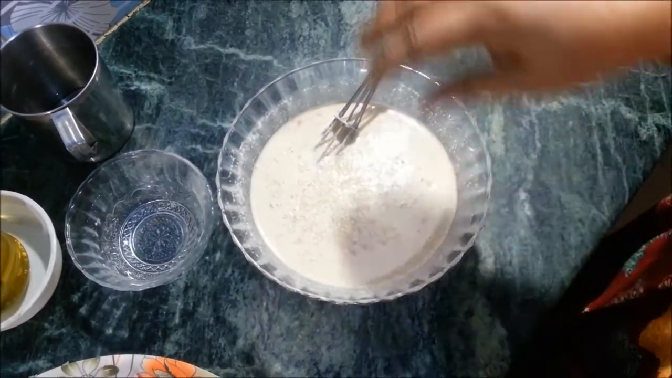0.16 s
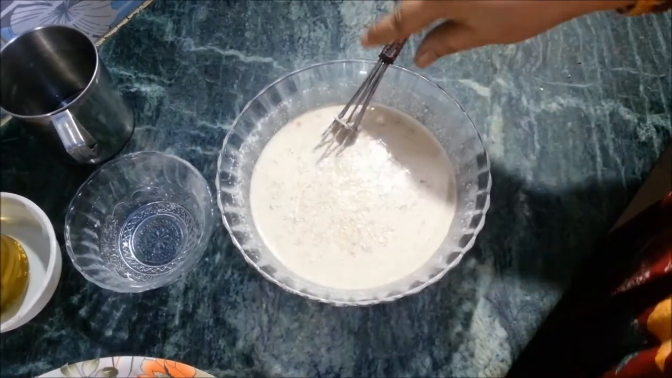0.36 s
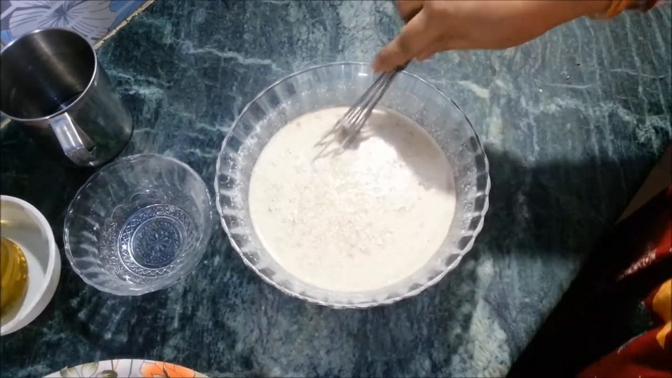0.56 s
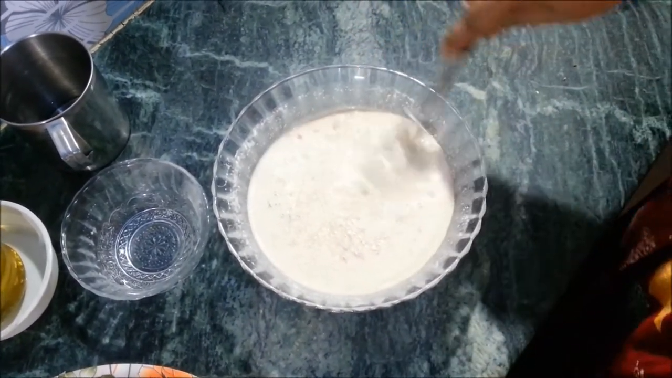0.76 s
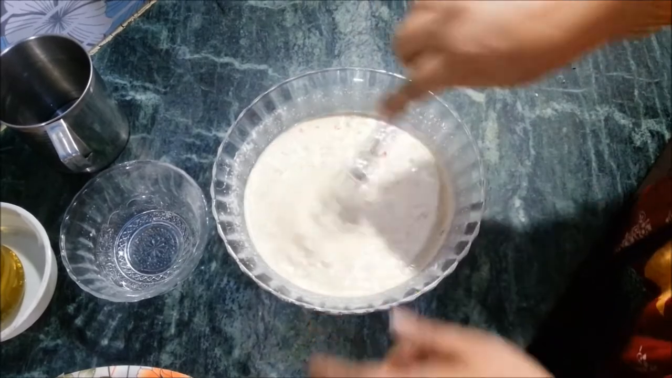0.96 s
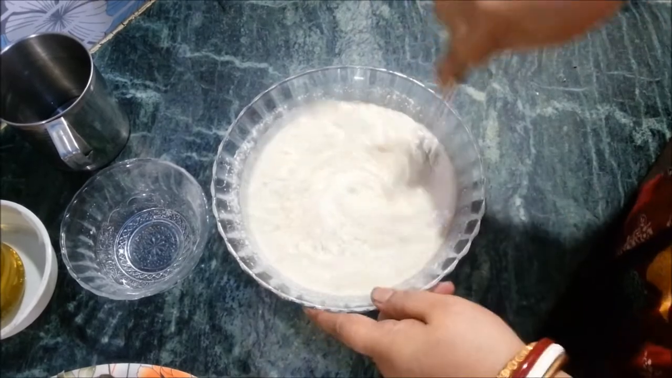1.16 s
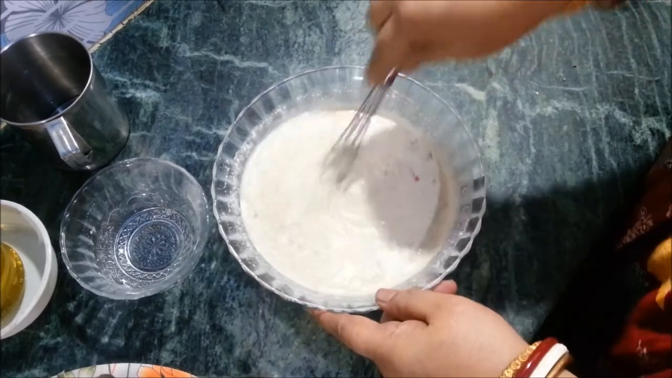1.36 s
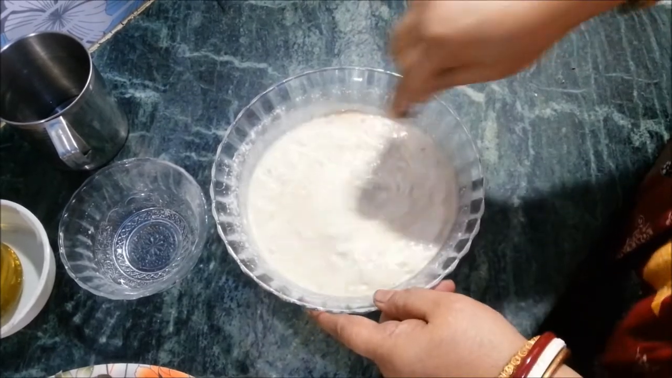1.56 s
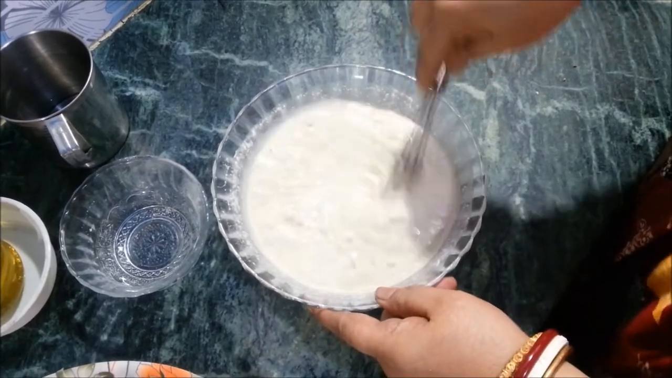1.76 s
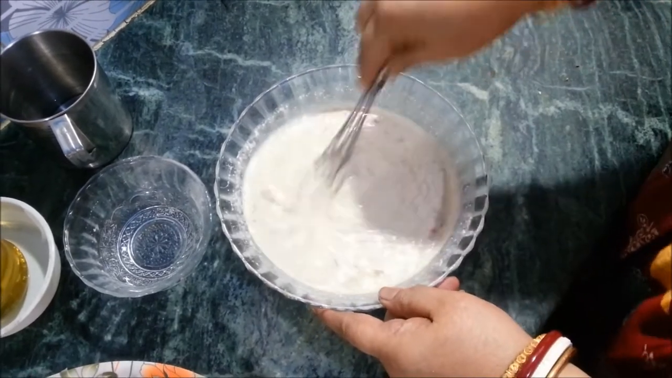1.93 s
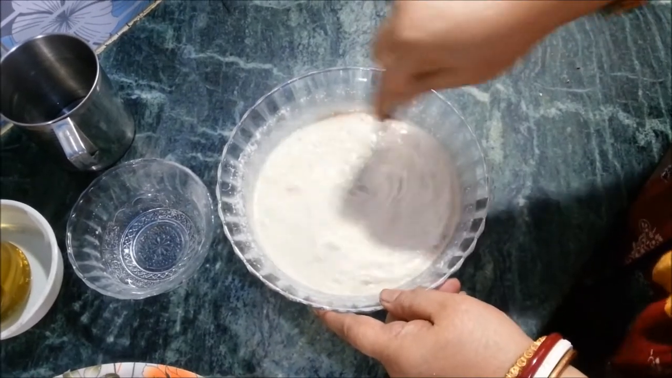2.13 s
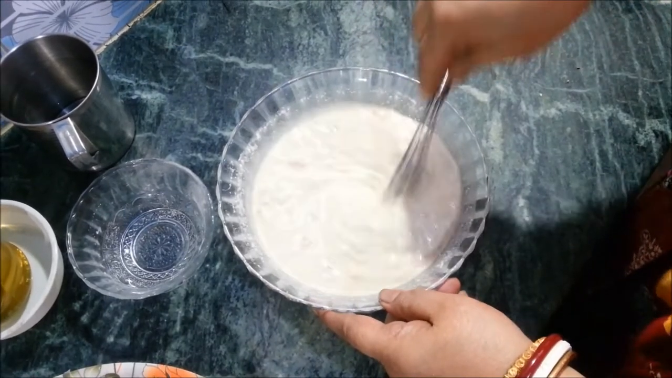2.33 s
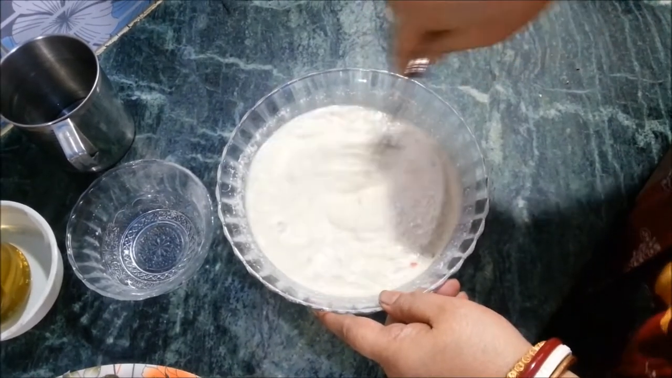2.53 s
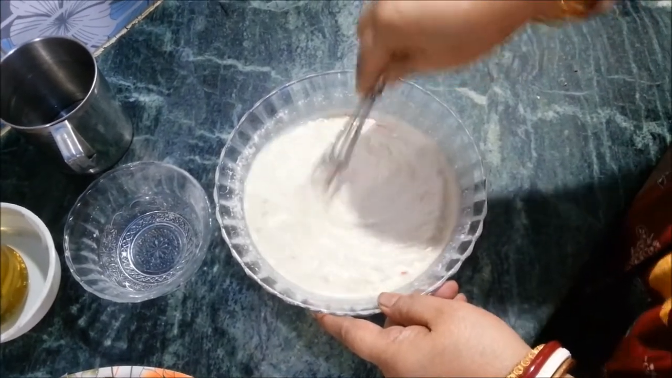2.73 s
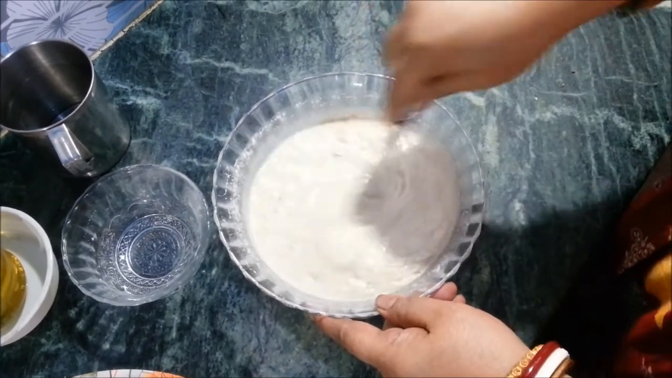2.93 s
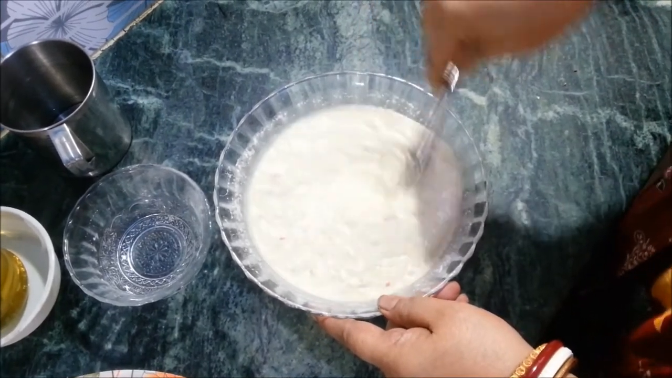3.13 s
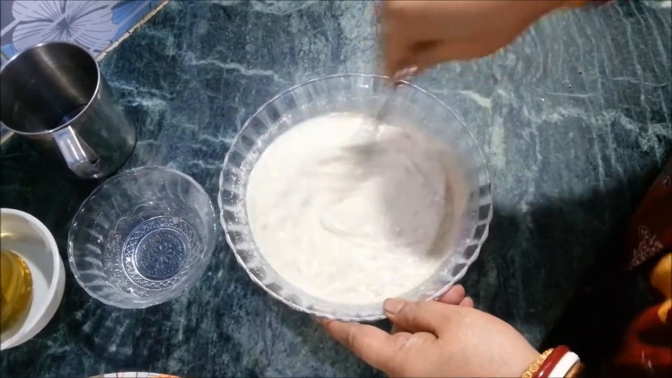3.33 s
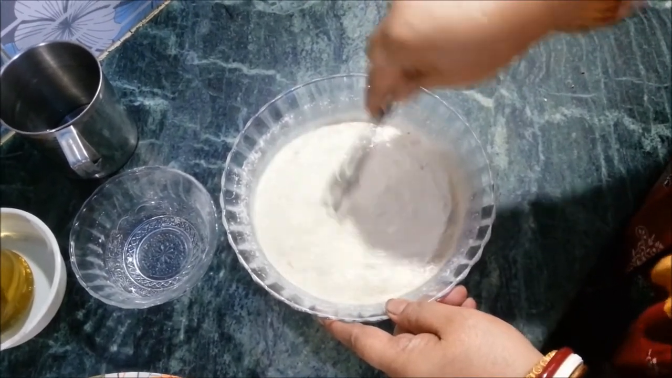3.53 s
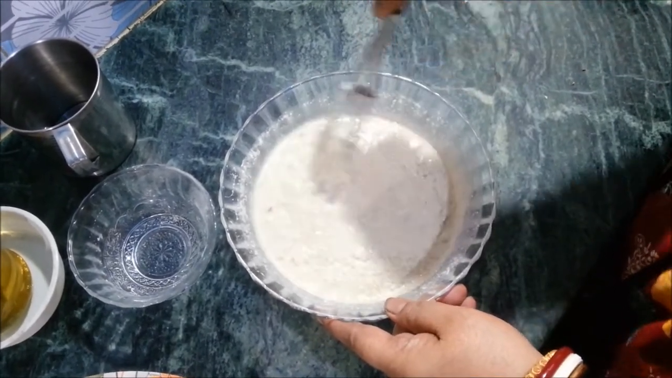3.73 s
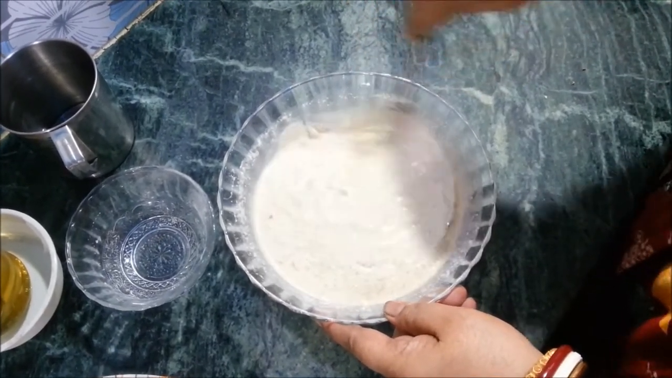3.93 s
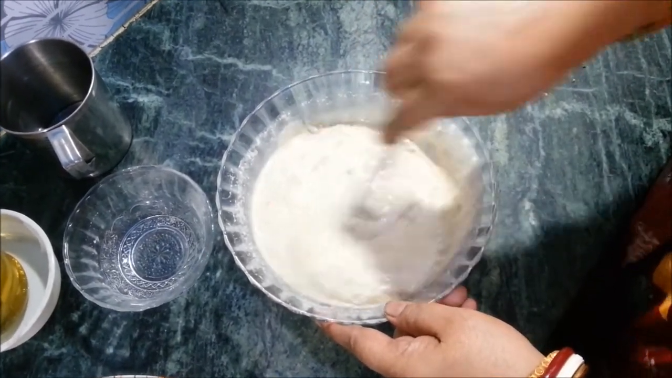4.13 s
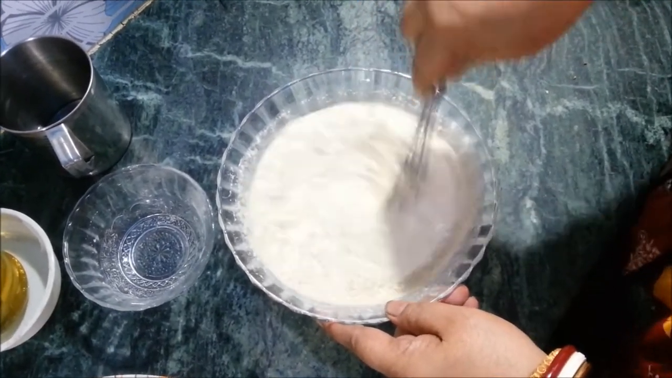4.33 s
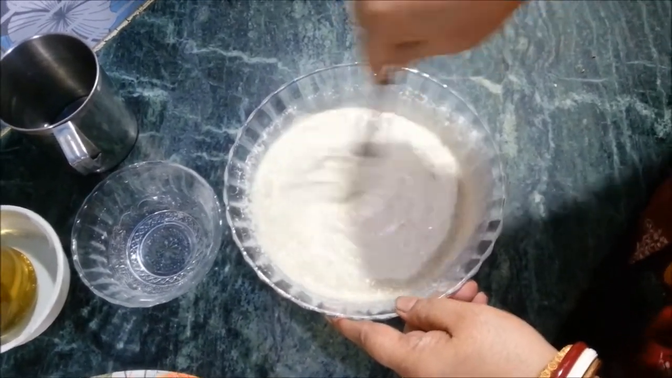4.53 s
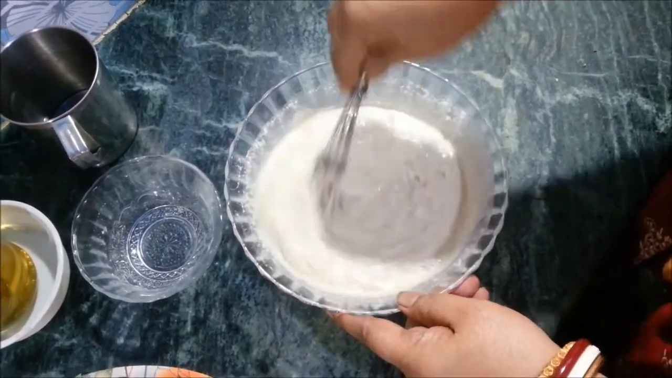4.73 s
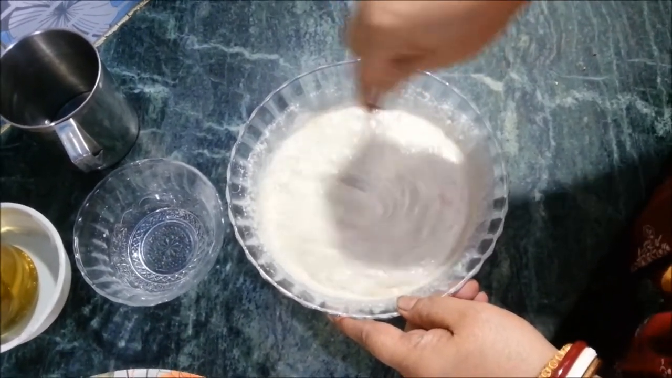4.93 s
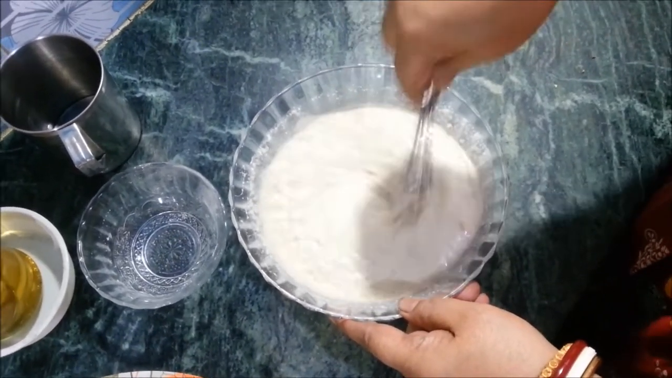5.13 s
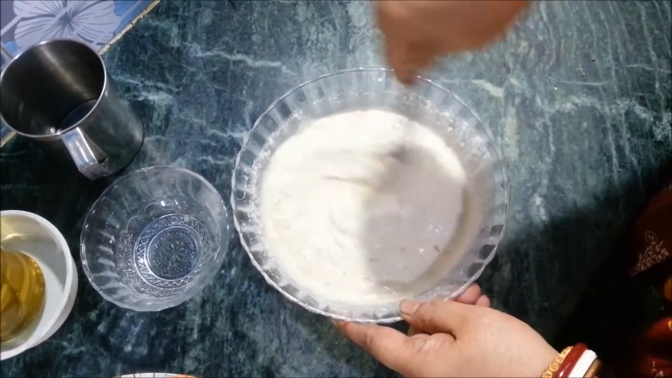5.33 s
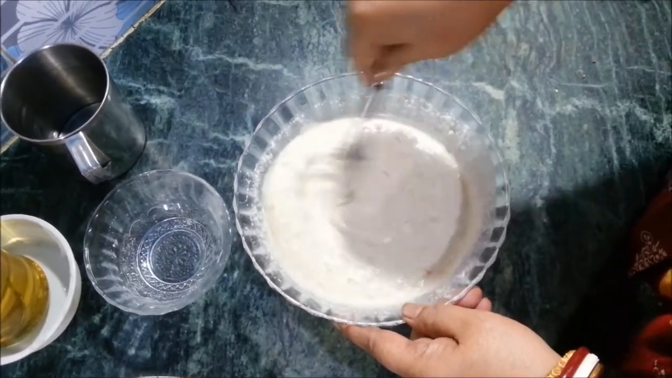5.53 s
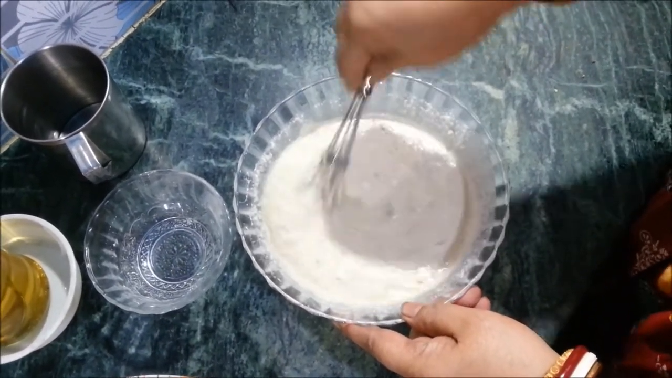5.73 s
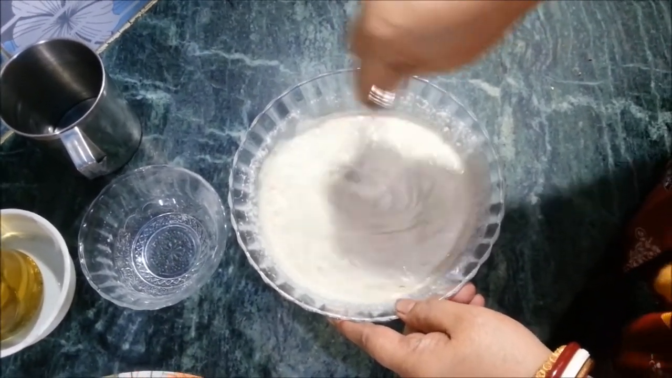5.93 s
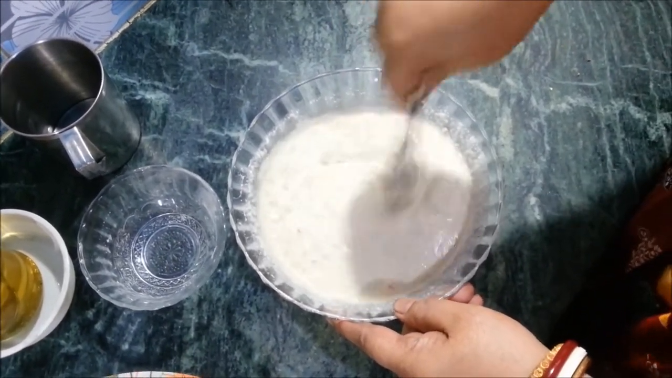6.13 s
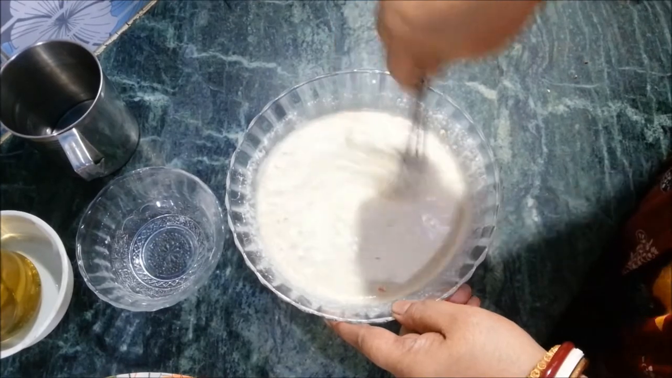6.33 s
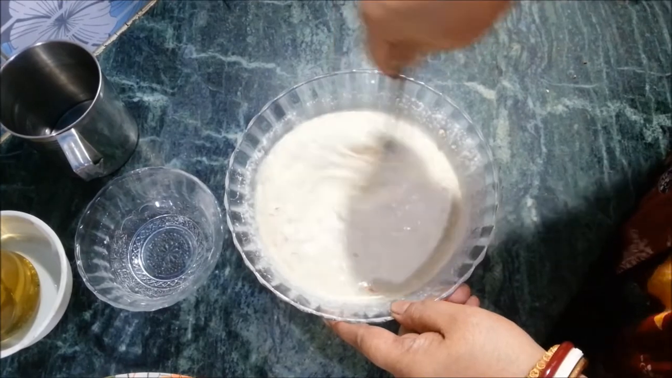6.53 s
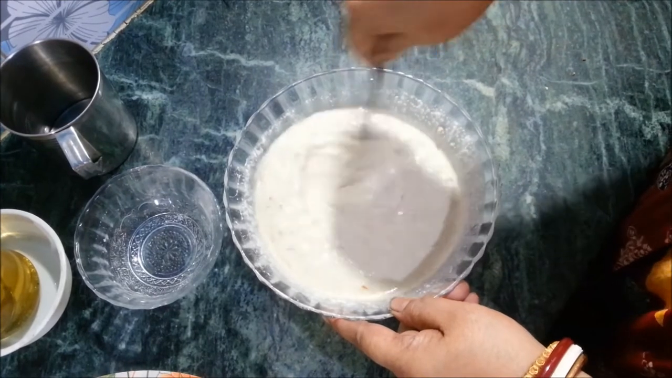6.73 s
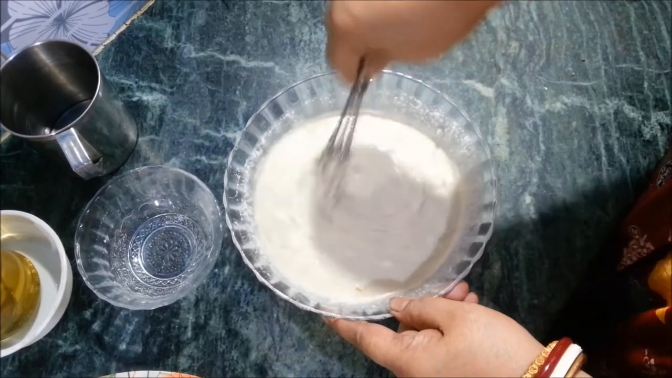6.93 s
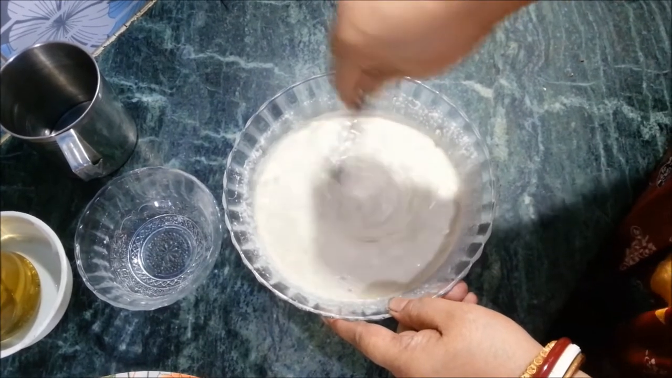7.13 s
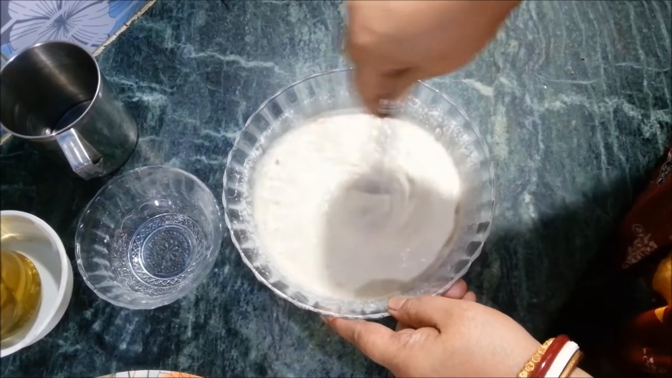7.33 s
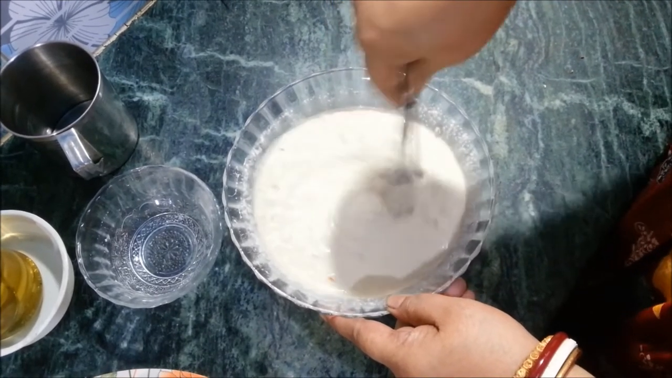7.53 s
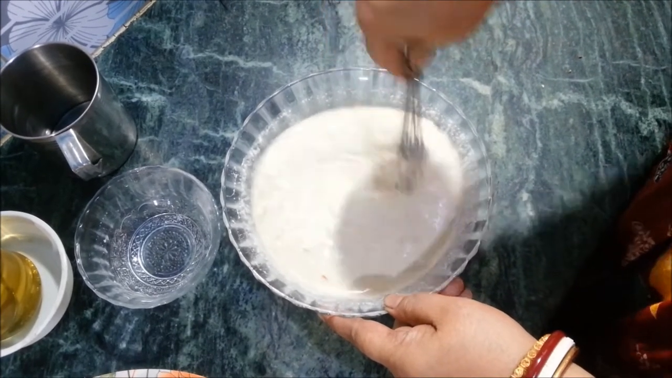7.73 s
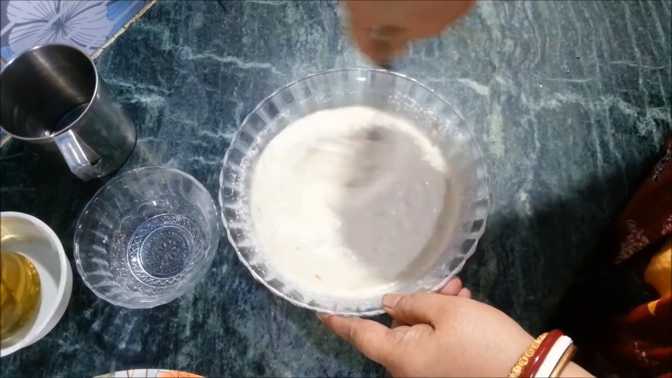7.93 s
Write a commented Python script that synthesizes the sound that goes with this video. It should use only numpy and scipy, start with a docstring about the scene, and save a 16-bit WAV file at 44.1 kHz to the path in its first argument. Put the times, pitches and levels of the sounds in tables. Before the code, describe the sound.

A close stereo pickup in a small, hard kitchen with quiet room noise and a wavering low hum. Around 0.2 s a small batter pop sounds, then two dry handle clacks on the glass rim at 0.35 and 0.45 s, with a brief scrape and slosh. After a short gap, wires tick at 0.85 s, and from 1.3 s the whisk beats quickly: bright, thin clicks in irregular clusters, short metallic rings and chattering scrapes, over faint wet slosh. A sharp fast wire rattle snaps at 3.9 s, followed by a plump batter pop at 4.25 s. From 4.6 to 5.4 s the ticks thin out and low pops and glugs show through. From about 5.8 s strokes knock the bowl harder and duller, with a strong scrape and slosh near 6.5 s. Clustered knocks then recur about every quarter second until the end at 8 s, with short echoes.

```python
"""Soft room noise and a wavering low hum, then a wire whisk beats thin batter in a glass bowl on stone.
Wires tick on the glass, ring briefly and chatter along the wall; many later strokes knock the bowl harder.
Blows and slips are noise bursts driving filters and decaying modes; batter is rising tones over a dull wash.
Pops, two rim clacks and one fast wire rattle join in. A small hard kitchen answers through decaying echoes,
heard close up by a two-port microphone."""
import sys
import numpy as np
from scipy import signal
from scipy.fft import rfft, irfft, next_fast_len
from scipy.io import wavfile
from scipy.ndimage import uniform_filter1d, map_coordinates

SR = 44100
rng = np.random.default_rng(int(sys.argv[2]) if len(sys.argv) > 2 else 0)


def generate_wav(sig):
    """Save sig (samples, or channels by samples) to the path in sys.argv[1] as 16-bit PCM at SR."""
    pcm = np.round(np.clip(np.atleast_2d(sig).T, -1, 1) * 32767).astype(np.int16)
    wavfile.write(sys.argv[1], SR, pcm)


N = 351440

# room noise spectrum: (frequency [Hz], relative density [dB per Hz])
AIR_SPECTRUM = [(15, -62), (25, -36), (101, -5), (152, -7), (234, -7.5), (484, -14), (585, -16.5),
                (634, -50), (1540, -37.5), (8190, -32), (12600, -28.5), (15600, -39)]
# room noise likeness of the ports: (frequency [Hz], left-right correlation [-1..1])
AIR_LIKENESS = [(60, -0.071), (240, 0.87), (950, 0.065), (3770, 0.057), (15000, -0.21)]
AIR_DB = -54.5
# hum, three low tones then two dull bands: (centre [Hz], width of each resonator pass [Hz])
HUM_BANDS = [(96.3, 11.8), (202.5, 19), (234.2, 14.3), (155, 36), (337.2, 43)]
# swell of the three low tones: (time [s], tone 1 [dB], tone 2 [dB], tone 3 [dB])
HUM_SWELL_DB = [(0.0, -57, -83, -70), (0.261, -60, -75, -54), (0.42, -45.5, -53, -58),
                (0.53, -51, -50, -51), (0.73, -74, -55, -54), (0.98, -60, -44, -72),
                (1.11, -68, -80, -56.5), (1.42, -61.5, -48.5, -53), (2.46, -66, -58.5, -58),
                (2.75, -51.5, -48.5, -52), (2.88, -58, -57.5, -56), (3.13, -68, -59, -64),
                (4.11, -60, -55.5, -71), (4.24, -54, -47.5, -50), (4.39, -71, -62.5, -73),
                (5.1, -58, -50.5, -54), (5.17, -64, -49, -72), (5.28, -67, -64, -54),
                (5.37, -57, -55, -46.5), (5.66, -70, -59, -64), (5.9, -50, -58, -65), (5.97, -65, -68, -60),
                (6.13, -58, -53, -73), (6.41, -66, -68, -51), (6.88, -62.5, -55.5, -63.5),
                (7.97, -75, -61.5, -61)]
# the two dull bands: settled level of each [dB]
DULL_BANDS_DB = [-66.5, -62.5]

# stirring: (time [s], wire chatter on the glass [dB], batter slosh [dB]), before mix trims
STIRRING = [(0.0, -67.5, -71.5), (0.511, -40.5, -49), (0.69, -59, -62.5), (1.2, -60, -74),
            (1.4, -45.5, -59), (1.88, -43, -57.5), (3.46, -43.5, -59.5), (3.64, -55.5, -61),
            (4.06, -42, -61), (4.28, -49.5, -68), (4.7, -54, -57.5), (4.86, -48.5, -61), (5.17, -67, -66.5),
            (5.26, -51.5, -63), (5.68, -62, -70.5), (6.1, -55, -71), (6.3, -38, -55), (6.441, -48.5, -56.5),
            (6.52, -33.5, -53.5), (6.62, -52, -47), (6.75, -60, -84), (6.85, -47.5, -77),
            (7.611, -58.5, -67), (7.97, -48.5, -68)]
# wire blows: (time [s], tick [dB], wire ring re tick [dB], bowl knock re tick [dB]), before mix trims
WIRE_BLOWS = [(0.166, -30, -32, -39), (0.3436, -16, -38, -11), (.361, -33, -28.5, -8),
              (0.4422, -18.5, -54, -8), (0.8468, -44, -28, -7), (0.863, -18.5, -17, -35),
              (.871, -15.5, -28, -46), (0.877, -22.5, 0, -31), (0.893, -23.5, -8, -23),
              (1.061, -26.5, -26, -35.5), (1.0725, -25.5, -29, -32), (1.0893, -33, -25, -27),
              (1.1201, -28.5, 18, -20), (1.278, -45.5, 10, -30), (1.3031, -9, -10, -65),
              (1.3199, -9.5, 1, -30), (1.3992, -16, -12, -52), (1.441, -27, 17, -40),
              (1.572, -23, -15, -49), (1.58, -26, -18, -45), (1.6047, -11, -8, -53),
              (1.6101, -12, -14, -47), (1.6405, -17, -24, -48), (1.709, -9, -11.5, -46),
              (1.749, -28, 3, -17), (1.857, -10.5, -21, -33), (1.876, -16, 10, -46), (1.884, -4, -18, -69),
              (2.021, -35, 7, -16), (2.0334, -18.5, -50.5, -20), (2.116, -20, -24, -27),
              (2.133, -11.5, -3, -45), (2.1606, -11, 3.5, -32.5), (2.2888, -28, 5.5, -34),
              (2.302, -18, -35, -22), (2.3875, -19.5, -6, -34), (2.4032, -5.5, -2, -45),
              (2.423, -16, -8, -44), (2.4343, -11, -4, -40), (2.453, -16, -4, -55),
              (2.5327, -13.5, -1, -32), (2.652, -22, -3, -41), (2.665, -19.5, -3, -41),
              (2.68, -8, 0.5, -46), (2.7225, -17.5, -2.5, -29), (2.7974, -11, -6.5, -34),
              (2.8467, -26.5, -13, -6.5), (2.9369, -16, -6, -36), (2.95, -11, 1.5, -36),
              (2.977, -17, -13, -30), (3.07, -28.5, -10, -15), (3.162, -36, -29, -19),
              (3.174, -27, -16, -29), (3.198, -19.5, -16, -36), (3.218, -6.5, -3, -37),
              (3.2604, -19, -8.5, -35), (3.274, -17, -7, -37), (3.3508, -15.5, -7.5, -30.5),
              (3.3954, -28.5, -28, -8), (3.4702, -16, -6, -28), (3.4885, -7.5, 0.5, -33),
              (3.609, -19.5, 7, -26), (3.637, -25, -22, -34), (3.751, -38.5, 15, -44),
              (3.787, -19, 15, -56.5), (3.7946, -4, -8.5, -51), (3.9003, -5.5, -27, -25.5),
              (3.9916, -38.5, 19, -45), (4, -32, -11, -38), (4.0668, -43, 11, -41), (4.1039, -13, -7, -54),
              (4.118, -17.5, 1, -47), (4.126, -7.5, -7.5, -38), (4.2839, -19.5, -10, -33),
              (4.3757, -47, 16, -38), (4.397, -32.5, 9, -48), (4.436, -12.5, -6, -54), (4.448, -12, 0, -55),
              (4.4524, -10, 1, -74), (4.51, -25.5, 5, -28), (4.557, -28, -15.5, -6), (4.561, -13, -1, -46),
              (4.7, -13.5, -13, -40), (4.704, -19, -25, -11), (4.739, -16.5, -10, -42),
              (4.8212, -8.5, -10.5, -32), (5.053, -16.5, -33, -11.5), (5.1152, -12, -33, -15.5),
              (5.2158, -31.5, -3.5, -19), (5.303, -34.5, -20, -4), (5.308, -24, -15, -13.5),
              (5.327, -25, -22, -29), (5.3639, -11.5, -35, -15), (5.467, -29.5, -7, -28),
              (5.537, -28, -38, -7.5), (5.5615, -18.5, -18, -24), (5.573, -22, -19, -24),
              (5.6187, -27.5, -34, -18), (5.735, -25.5, 0.5, -28), (5.797, -15, -21, -6.5),
              (5.815, -28, -16, -28), (5.823, -16, -12, -49), (5.854, -13, -28, -13.5),
              (5.963, -25, -4, -30), (6.0573, -31, -20.5, -0.5), (6.0637, -23, -4, -28),
              (6.068, -22.5, -21, -15), (6.1019, -9, -56, -17.5), (6.109, -9.5, -47, -15),
              (6.116, -14.5, -49, -10), (6.2258, -29.5, -12, -13), (6.3075, -16, -3, -29),
              (6.317, -15, -53, -25.5), (6.3412, -22.5, -39, -8.5), (6.347, -19, -38, -10.5),
              (6.471, -28, -12, -13.5), (6.515, -36, -26, -26), (6.527, -38, -28.5, -12.5),
              (6.5486, -18, -9, -17.5), (6.567, -23, -21, -10), (6.572, -14, -20, -11.5),
              (6.578, -14.5, -33, -16), (6.7775, -38.5, -25, 6), (6.7904, -22, -18, -10),
              (6.805, -16.5, -22, -7), (6.8099, -9.5, -29, -13.5), (6.86, -32.5, -49, 0.5),
              (7.011, -30, -1, -11), (7.0208, -6, -31, -14), (7.2404, -14, -37, -9),
              (7.2587, -16.5, -8, -27), (7.277, -17.5, -27, -14.5), (7.286, -20, -23, -9),
              (7.483, -48, -20, -4), (7.493, -26.5, 0.5, -11.5), (7.501, -26, -3, -7),
              (7.512, -30, -48, 0.5), (7.7154, -18.5, -27, -8.5), (7.734, -18, -39, -7.5),
              (7.744, -16, -41, -9.5), (7.927, -48, -31, -8), (7.9397, -11, -47.5, -19),
              (7.9413, -15.5, -51, -18), (7.9549, -13.5, -34, -17)]
# tick of wire on glass: (frequency [Hz], relative density [dB per Hz])
TICK_SPECTRUM = [(900, -106.5), (1040, -22), (2150, -18.5), (5340, -8), (6540, 4), (8200, -5.5),
                 (8920, -10.5), (12500, -18), (14300, -25.5), (14900, -29.5), (15600, -82)]
# glass under a wire, also the batter wash: (frequency [Hz], relative gain [dB])
THUD_SPECTRUM = [(150, -57), (400, -14.5), (900, -4), (1300, -4.5), (2500, -6), (4500, -15), (9000, -55.5)]
# the wires' own ring: (frequency [Hz], relative level [dB], t60 [s])
WIRE_MODES = [(4075, -17, 0.033), (5910, -12, 0.053), (8080, 2.5, 0.038), (8340, 0.5, 0.023),
              (11450, -12.5, 0.094), (13500, -10.5, 0.056), (13500, -5.5, 0.073)]
# the bowl, damped by batter and hand: (frequency [Hz], relative level [dB], t60 [s])
BOWL_MODES = [(404, 2, 0.047), (449, 0.5, 0.033), (860, -10.5, 0.17), (922, -4, 0.15), (1025, 2, 0.038),
              (1159, 4, 0.045), (1247, -6.5, 0.27), (1683, 3, 0.038), (1822, -0.5, 0.022),
              (2490, 5.5, 0.016), (3347, 0.5, 0.023), (4390, 2.5, 0.015), (5400, 5, 0.037),
              (7180, 13.5, 0.04)]
# a freely ringing wire ticks brighter; a blow that knocks the bowl cracks lower; both scatter per blow
BRIGHT_DB, BRIGHT_DB_PER_RING_DB = 1, 0.3
CRACK_DB, CRACK_DB_PER_KNOCK_DB, SCATTER_DB = -4.5, 0.13, 2.5
SKID_LEAD_S = .003  # the skid starts just ahead of the blow
DAMPING_DB_PER_S = 360  # typical extra damping of a ring by the batter

# kitchen reverberation: (frequency [Hz], t60 [s])
KITCHEN_T60 = [(300, 0.69), (800, 0.42), (2100, 0.36), (5500, 0.27), (14600, 0.25)]
# port imbalance: (frequency [Hz], left minus right [dB])
PORT_LEAN = [(60, 0), (180, 10), (380, 9.5), (800, -1), (1650, 5), (3440, -0.5), (5000, -3.5), (6800, -19),
             (8300, -10), (9700, -3.5), (12000, -11.5), (13600, -12.5), (15000, -9)]
LEFT_LAG_S, LAG_WANDER_S, LAG_SETTLES_S = 0.00016, 0.000284, 4.95

# batter pops: (time [s], level [dB], pitch [Hz], snap re low tone [dB]), before mix trims
BATTER_POPS = [(0.211, -38, 264, 21.5), (0.231, -25, 252, -1), (2.029, -43, 311, 1), (2.305, -37, 212, 24),
               (2.843, -47, 225, 32.5), (4.2406, -15, 298, 11.5), (4.582, -27, 298, -27),
               (4.7, -33, 410, -8), (4.799, -31.5, 229, 21.5), (4.894, -29, 230, -11.5),
               (4.973, -31, 186, 13.5), (5.06, -20, 184, -5), (5.097, -22, 178, -19),
               (5.393, -23, 216, -10)]
# handle on rim: (time [s], level [dB])
RIM_CLACKS = [(.3426, -26), (.4428, -15)]
# rim clack spectrum: (frequency [Hz], relative density [dB per Hz])
RIM_SPECTRUM = [(300, -13), (900, -6), (1500, 8.5), (2600, -3), (3050, -4), (6000, -35)]
BUZZ_S, BUZZ_DB, BUZZ_RATE_HZ, BUZZ_T60_S = 3.8992, 2, 1445, .024
# wire rattle spectrum: (frequency [Hz], relative density [dB per Hz])
BUZZ_SPECTRUM = [(900, -30), (1400, -12), (3000, -4.5), (5800, 7), (7400, 4.5), (8200, -29)]
EDGE_HZ = 15795


def gain_of(db):
    """Amplitude ratio of a level in dB."""
    return 10 ** (np.asarray(db) / 20)


def evened(x):
    """Scale to unit RMS."""
    return x / np.sqrt(np.mean(x ** 2) + 1e-20)


def read(points, hz):
    """Interpolate a table on a log frequency axis."""
    f, value = np.transpose(points)
    return np.interp(np.log(hz + 1), np.log(f + 1), value)


def coloured(x, points, lo_hz=0, hi_hz=SR):
    """Unit-energy causal filter, falling outside lo-hi: phase is the Hilbert transform of log gain."""
    hz = abs(np.fft.fftfreq(4096, 1 / SR)) + 1
    edges_db = 10 * np.log10((1 + (lo_hz / hz) ** 10) * (1 + (hz / hi_hz) ** 10))
    log_gain = np.log(gain_of(np.maximum(read(points, hz) - edges_db, -100)))
    response = np.exp(np.conj(signal.hilbert(log_gain)))
    taps = np.fft.ifft(response).real[:2048]
    return signal.oaconvolve(x, taps / np.linalg.norm(taps))[:N]


def resonate(x, hz, width_hz):
    """One resonance, scaled to keep the power of white noise."""
    r = np.exp(-np.pi * abs(width_hz) / SR)
    pole = r * np.exp(2j * np.pi * hz / SR)
    return signal.lfilter([np.sqrt(2 * (1 - r * r))], [1, -pole], x).imag


def air():
    """Soft room noise: random spectra partly shared by the ports, with drifting patches."""
    frames, hz = N // 256 + 5, np.fft.rfftfreq(1024, 1 / SR)
    a, b, c, d, patches = rng.standard_normal((frames, 513, 5)).T
    patches = uniform_filter1d(patches, size=10, axis=0)  # over frequency
    patches = evened(uniform_filter1d(patches, size=14, axis=1))  # over time
    same = np.clip(read(AIR_LIKENESS, hz), -1, 1)[:, None]
    left = a + 1j * b
    right = same * left + np.sqrt(1 - same ** 2) * (c + 1j * d)
    spectra = np.array([left, right]) * gain_of(read(AIR_SPECTRUM, hz)[:, None] + 6.9 * patches)
    noise = signal.istft(spectra, nperseg=1024, noverlap=768)[1][:, :N]
    return gain_of(AIR_DB) * evened(noise)


def hum():
    """Resonated noise: low tones swell and fade separately, two dull bands rise in; ports fairly alike."""
    at, *tone_db = np.transpose(HUM_SWELL_DB)
    noise, t = rng.standard_normal((2, N)), np.arange(N) / SR
    noise[1] = 0.84 * noise[0] + 0.34 * noise[1]
    levels_db = [np.interp(t, at, db) for db in tone_db]
    levels_db += [db - 12 * np.exp(-t / 0.55) for db in DULL_BANDS_DB]
    out = np.zeros((2, N))
    for (hz, width_hz), db in zip(HUM_BANDS, levels_db):
        band = resonate(resonate(noise, hz, width_hz), hz, width_hz)
        out += gain_of(db) * evened(band)
    return out


def chatter(per_s=1200, spread_db=8.5):
    """Wires skipping along glass: tiny slips of uneven size modulate rubbing noise."""
    slips = (rng.random(N) < per_s / SR) * gain_of(spread_db * np.minimum(rng.exponential(1, N), 4))
    t = np.arange(200) / SR
    decaying = signal.oaconvolve(slips, gain_of(-60 * t / 0.089))[:N]
    grip = 1.14 + evened(decaying)  # steady rub under the slips
    return evened(grip * rng.standard_normal(N))


def batter(stir, per_s=400, wash=0.67):
    """Thick bubbles and glugs: short rising tones of many sizes over a dull wash, in lumps."""
    sizes = (rng.random(N) < per_s / SR) * gain_of(5.5 * np.minimum(rng.exponential(1, N), 4))
    kind, glugs = rng.integers(0, 12, N), np.zeros(N)
    for k, hz in enumerate(np.geomspace(300, 3000, 12)):
        u = np.arange(round(6 * SR / hz)) * hz / SR  # cycles
        glug = np.sin(2 * np.pi * u * (1 + 0.0052 * u)) * u * np.exp(-u / 0.5)
        glugs += signal.oaconvolve(sizes * (kind == k), glug)[:N]
    steps = np.arange(0, N / SR + 1, .035)
    lumps_db = np.interp(np.arange(N) / SR, steps, 7.1 * rng.standard_normal(len(steps)))
    texture = evened(glugs) + wash * coloured(rng.standard_normal(N), THUD_SPECTRUM)
    return stir * evened(gain_of(lumps_db)) * texture


def contacts(seconds, gains, landings, t60):
    """Several landings within milliseconds, each a rough burst that dies at once."""
    t = np.arange(900) / SR
    out = np.zeros(N + len(t))
    delay_s, strength = landings[:, :, :1], landings[:, :, 1:]
    since = t - delay_s
    shape = (strength * gain_of(-60 * abs(since) / t60) * np.clip(since / 0.00038, 0, 1)).sum(1)
    bursts = shape * rng.choice([-1., 1.], shape.shape)
    for s, gain, burst in zip(seconds, gains, bursts):
        out[round(s * SR):][:len(t)] += gain * burst
    return out[:N]


def skid(seconds, gains, peak_s):
    """Skid envelope around each blow: pressure swells, then eases."""
    train, t = np.zeros(N), np.arange(6000) / SR
    np.add.at(train, np.round((seconds - SKID_LEAD_S) * SR).astype(int), gains)
    return signal.oaconvolve(train, t / peak_s * np.exp(1 - t / peak_s))[:N]


def rings(seconds, gains, modes, detune, uneven_db, rise_s):
    """Each blow sounds every mode as three beating, slightly detuned, uneven, variably damped partials."""
    t = np.arange(4000, dtype=np.float32) / SR
    hz, db, t60 = np.transpose(modes * 3)[:, :, None]
    decays = (gain_of(db - 60 * t / t60) * np.minimum(t / rise_s, 1)).astype(np.float32)
    out = np.zeros(N + len(t))
    chances = rng.standard_normal((len(seconds), 4, len(hz), 1)).clip(-2, 2)
    for s, gain, chance in zip(seconds, gains, chances):
        off_pitch = 1 + detune * (chance[0] + chance[3, 0])  # per partial + per blow
        phase = (2 * np.pi * (hz * off_pitch * t + chance[1])).astype(np.float32)
        strengths = gain * gain_of(uneven_db * chance[2, :, 0])
        damping = gain_of(-DAMPING_DB_PER_S * chance[3, 1] ** 2 * t)
        out[round(s * SR):][:len(t)] += strengths @ (decays * np.sin(phase)) * damping
    return out[:N]


def whisk():
    """Blows and chatter excite a broad tick; blows ring the wires' and bowl's modes; stirring moves batter."""
    s, db, ring_db, knock_db = np.transpose(WIRE_BLOWS)
    # (delay [s], strength) of five wires, most of them light
    landings = rng.random((len(s), 5, 2)) ** [1, 2] * [.008, .4]
    landings[:, 0] = [0, 1]
    scatter_db = SCATTER_DB * rng.standard_normal((len(s), 2))
    bright_db = BRIGHT_DB + BRIGHT_DB_PER_RING_DB * ring_db + scatter_db[:, 0]
    crack_db = CRACK_DB + CRACK_DB_PER_KNOCK_DB * knock_db + scatter_db[:, 1]
    at, drag_db, slosh_db = np.transpose(STIRRING)
    t, slips = np.arange(N) / SR, chatter()
    rub = gain_of(np.interp(t, at, drag_db)) * slips

    def struck(rel_db, t60):
        """Landing bursts plus the skid of slips around them."""
        gains = gain_of(db + rel_db)
        return contacts(s, gains, landings, t60) + gain_of(-21.0) * skid(s, gains, peak_s=0.0029) * slips

    tick = coloured(struck(2.4, 0.0057) + rub, TICK_SPECTRUM, lo_hz=4000, hi_hz=8370)
    tick += coloured(struck(bright_db, 0.013) + 0.53 * rub, TICK_SPECTRUM, lo_hz=9090)
    tick += coloured(struck(crack_db, 0.0022) + 0.26 * rub, TICK_SPECTRUM, hi_hz=3680)
    ring = rings(s, gain_of(db + ring_db - 13.0), WIRE_MODES, detune=0.00865, uneven_db=6.5, rise_s=0.0016)
    knock = rings(s, gain_of(db + knock_db - 14.5), BOWL_MODES, detune=0.015, uneven_db=4, rise_s=0.0021)
    thud = coloured(struck(knock_db + 3, 0.0092), THUD_SPECTRUM)
    slosh = batter(gain_of(np.interp(t, at, slosh_db)))
    return gain_of(-2.5) * tick + ring + knock + thud + slosh


def kitchen(x):
    """Sparse random-sign echoes, each band dying at its own speed; they vary with port and whisk position."""
    taps = np.zeros((4, SR // 2))
    at = np.arange(80, SR // 2 - 10, 10) + rng.integers(0, 10, (4, (SR // 2 - 81) // 10))
    np.put_along_axis(taps, at, rng.choice([-1., 1.], at.shape), 1)
    hz, t, z = signal.stft(taps, SR, nperseg=128)
    decay = gain_of(-60 * t / read(KITCHEN_T60, hz)[:, None])
    tail = signal.istft(z * decay, SR, nperseg=128)[1]
    tail *= np.minimum(np.arange(tail.shape[1]) / SR / 0.0013, 1)  # onset ramp
    turn = 2 * np.pi * 2.3 * np.arange(N) / SR  # 2.3 turns per second
    places = x * np.array([np.cos(turn), np.cos(turn), np.sin(turn), np.sin(turn)])
    heard = signal.fftconvolve(places, tail / np.linalg.norm(tail[0]), axes=1)[:, :N]
    return heard[:2] + heard[2:]


def ports(x):
    """Ports face different ways: the left gets less treble, later on average, by a wandering delay."""
    size = next_fast_len(N + 64)
    lean_db = read(PORT_LEAN, np.fft.rfftfreq(size, 1 / SR))
    port_gains = gain_of([np.minimum(lean_db, 0), -np.maximum(lean_db, 0)])
    left, right = irfft(rfft(x, size) * port_gains, size)[:, :N]
    t, steps = np.arange(N) / SR, np.arange(0, N / SR + 1, .13)
    span = np.clip((LAG_SETTLES_S - steps) / 0.32, .15, 1)  # wanders far less once settled
    wander_s = LAG_WANDER_S * rng.standard_normal(len(steps)) * span
    late = np.arange(N) - SR * (LEFT_LAG_S + np.interp(t, steps, wander_s))
    return np.array([map_coordinates(left, late[None], order=3), right])


def pops():
    """Batter pops and slaps: a few cycles of a fast-dying low pitch with a short, soft-edged snap."""
    out, t = np.zeros(N + 900), np.arange(900) / SR
    for s, db, hz, snap_db in BATTER_POPS:
        low = np.sin(2 * np.pi * hz * t) * gain_of(-60 * t / 0.012) * np.minimum(t / 0.00093, 1)
        snap_shape = np.exp(-((t - .0013) / 0.00061) ** 2)
        snap = np.sin(2 * np.pi * 1450 * t) * gain_of(snap_db - 20) * snap_shape
        out[round(s * SR):][:len(t)] += gain_of(db + 2.0) * (low + snap)
    return signal.sosfilt(signal.butter(2, 130, "high", fs=SR, output="sos"), out[:N])


def rim():
    """The handle strikes the bare rim: a dry, broad clack that bounces a little."""
    s, db = np.transpose(RIM_CLACKS)
    bounces = rng.random((len(s), 5, 2)) * [.012, .5]  # (delay [s], strength)
    bounces[:, 0] = [0, 1]
    return coloured(contacts(s, gain_of(db), bounces, 0.015), RIM_SPECTRUM)


def buzz():
    """One wire rattles fast on the glass: seven evenly spaced rebounds dying within milliseconds."""
    since, train = np.arange(7) / BUZZ_RATE_HZ, np.zeros(N)
    train[np.round((BUZZ_S + since) * SR).astype(int)] = gain_of(BUZZ_DB - 60 * since / BUZZ_T60_S)
    return coloured(train, BUZZ_SPECTRUM)


def scene():
    """Sum direct sound, kitchen echoes, pops stronger at the left, room noise and hum."""
    near, slaps = whisk() + rim() + buzz(), pops()
    tail = kitchen(near + 0.058 * slaps)
    bowl = gain_of(2.0) * ports(near + gain_of(-3.0) * tail)
    return bowl + slaps * gain_of([[3], [-4]]) + air() + hum()


def record(dry):
    """Peaks saturate softly; then the band limit."""
    band_limit = signal.firwin(255, EDGE_HZ, window=("kaiser", 9), fs=SR)
    return signal.oaconvolve(0.91 * np.tanh(dry), band_limit[None], "same")


dry = scene()
out = record(dry)
generate_wav(out)
```